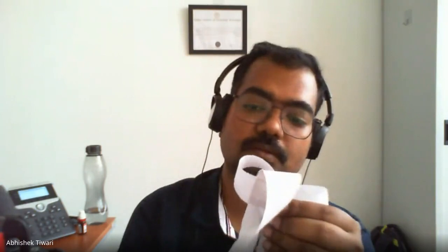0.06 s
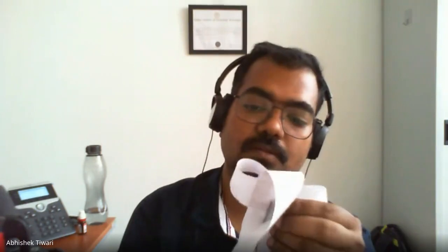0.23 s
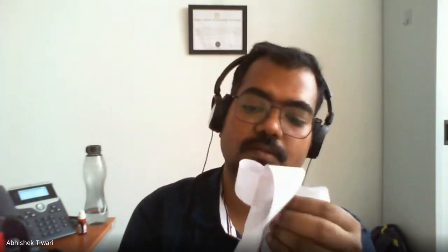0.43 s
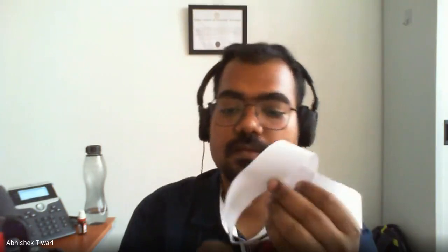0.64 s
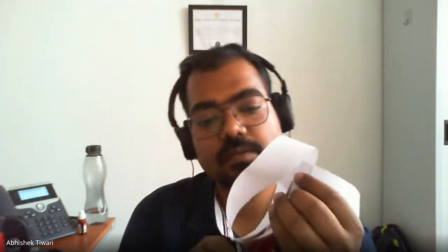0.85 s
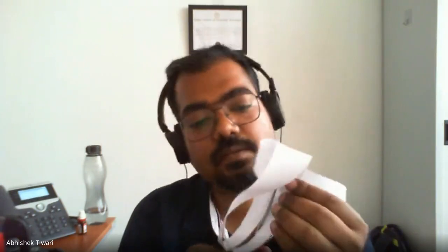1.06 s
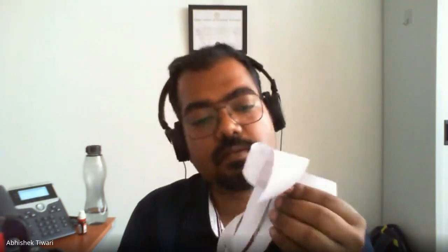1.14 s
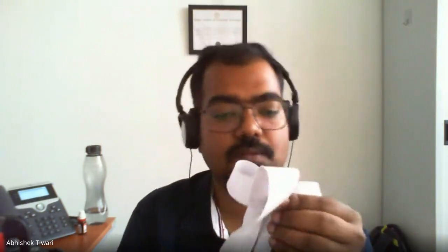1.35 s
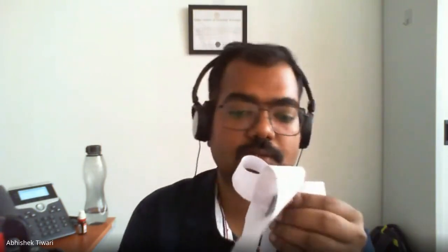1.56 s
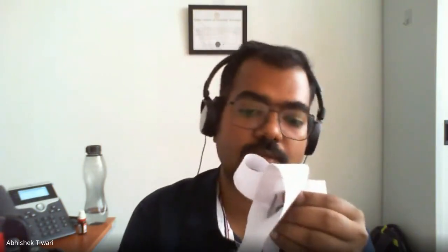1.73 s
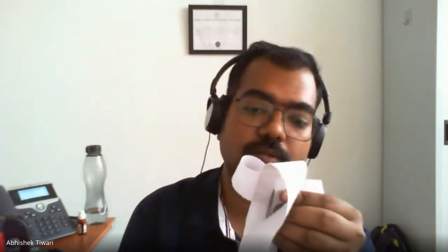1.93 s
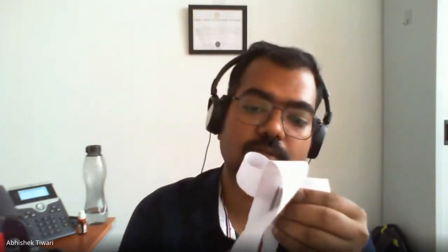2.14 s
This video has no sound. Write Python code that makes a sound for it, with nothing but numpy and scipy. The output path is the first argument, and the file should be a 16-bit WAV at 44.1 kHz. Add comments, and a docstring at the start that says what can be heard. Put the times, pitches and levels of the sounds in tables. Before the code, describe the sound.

Crisp close scissor snips through stiff paper, followed by near quiet, a brief papery slide and two dull thuds

```python
"""Scissors and a paper loop

Scissors and a stiff paper loop are heard close to a microphone in a small hard room, over a faint fan.
The paper snaps and ticks: short noise bursts. It hisses as it slides and is cut: grainy noise ringing the loop.
Fading tones make the short rings and, near the end, two soft thuds on the desk.
The room adds a noise tail. The fan is low noise with two unsteady tones; a noise suppressor and line hiss follow."""
import sys
import numpy as np
from scipy import signal
from scipy.fft import rfft, irfft
from scipy.io import wavfile
from scipy.ndimage import uniform_filter1d, map_coordinates

SR = 44100
rng = np.random.default_rng(int(sys.argv[2]) if len(sys.argv) > 2 else 0)


def elevation(decibels):
    """Turn decibel levels (scalar or array-like) into linear amplitude ratios."""
    levels = np.asarray(decibels, float)
    return 10 ** (levels / 20)


def to_wav(s):
    """Save 16-bit WAV."""
    ch = np.atleast_2d(s).T  # columns
    pcm = np.round(np.clip(ch, -1, 1) * 32767)  # PCM
    wavfile.write(sys.argv[1], SR, pcm.astype(np.int16))


N = 94815  # samples in the scene

# Paper snaps and ticks: peak_s, level_db (before the common snap level), t60_s (time to fall 60 dB),
# tilt_db_per_octave (above zero is brighter)
SNAPS = [(0.197, -32, .05, -8), (0.203, -12.5, .02, 1.5), (.2032, 1.5, .01, 3.5), (0.2052, -7, 0.058, -5),
         (0.235, -8.5, 0.027, 2), (0.2356, -22, .07, -15.5), (0.418, -27.5, 0.072, -8),
         (0.4266, -9, 0.016, -2), (.437, -22, 0.027, -2.5), (.4405, -6.5, 0.024, -3),
         (0.4498, -39.5, 0.24, -27), (0.4873, -22.5, 0.038, -9.5), (.543, -29, 0.085, -7.5),
         (0.5522, -19.5, 0.046, -3.5), (1.37, -35.5, 0.053, 7), (1.377, -43.5, 0.099, -10.2),
         (1.5438, -35, 0.039, 7.5), (1.554, -38, 0.041, 4), (1.651, -40.5, .025, 14.5),
         (1.751, -45.5, .02, 8), (1.771, -35, 0.048, 16.5), (1.7927, -31, 0.017, 10.5)]
# Colour of a snap before its tilt: frequency_hz, relative_gain_db
SNAP_COLOUR = [(180, -61.5), (400, -32.5), (1000, -27), (1600, -19.5), (2400, -12.5), (3500, -5.5),
               (4600, -2), (6000, -2.5), (8000, -5.5), (10000, -3), (12000, -10), (14600, -23),
               (16400, -49)]
# Paper slides and cuts: start_s, length_s, level_db, tilt_db_per_octave, release_t60_s
SLIDES = [(.172, 0.0074, -58.5, -0.5, .03), (0.183, 0.012, -57.5, 2.5, .03), (0.206, 0.038, -39, -7.4, 0.3),
          (0.506, 0.075, -44, 1, 0.056), (0.529, 0.027, -37, 0.9, 0.15), (.62, 0.048, -58.5, 3, 0.16),
          (0.691, 0.074, -62, 2.5, .2), (0.761, .03, -59, 2.9, .1), (.84, .09, -73, 2, 0.069),
          (1.338, 0.02, -62, 2, 0.034), (1.365, .02, -67, 13, 0.074), (1.482, 0.019, -69.5, 3, 0.035),
          (1.52, 0.022, -68, 1, 0.038), (1.553, .02, -75, 7.5, .05), (1.6, 0.015, -68, -1.5, 0.029),
          (1.645, 0.033, -67.5, 0, 0.3), (1.772, 0.046, -51, -1.4, .15), (1.835, 0.073, -37, -1.1, .12),
          (1.9, .04, -45, -1.9, 0.088), (1.943, 0.032, -66, 4.5, 0.39), (1.95, 0.039, -59.5, -5.5, 1)]
# Colour of a slide before its tilt and the loop's ring: frequency_hz, relative_gain_db
SLIDE_COLOUR = [(180, -51), (300, -25.5), (606, -16.5), (1000, -9.5), (1310, -16.5), (1500, -12.5),
                (2230, -9), (2430, -10), (10800, -4), (14800, -15), (16400, -51)]
# Resonances of the paper loop: centre_hz, width_hz, level_db (before the loop's share)
LOOP_RESONANCES = [(1058, 30, -4), (1529, 130, 6.5), (2345, 130, 8), (2786, 150, 5.5), (4390, 160, -2.5)]
# Short single rings of blade and loop: start_s, pitch_hz, level_db, t60_s
RINGS = [(.205, 389.5, -48.5, 0.34), (.4415, 5040, -19, .045), (.494, 4980, -44, 0.12),
         (.578, 399, -52.5, 0.31), (.776, 4520, -63.5, 0.18), (1.373, 951.5, -50, 0.098),
         (1.548, 1435, -70, .05), (1.55, 942, -62, 0.075), (1.769, 2720, -53.5, 0.25),
         (1.777, 4570, -61, 0.18), (1.789, 1510, -47, 0.11)]
# Soft thuds on the desk: start_s, level_db
THUDS = [(2.049, -46), (2.128, -49.5)]
# Tones of the desk in each thud: pitch_hz, level_db (within the thud), t60_s
DESK_TONES = [(121.25, 6.5, 0.19), (206.2, -1.5, 0.21), (760, -9.5, 0.13)]
# How long the room's echo lasts: frequency_hz, t60_s
ROOM_DECAY = [(300, 1), (1200, 0.64), (2500, 0.89), (6000, 0.43), (12000, 0.35)]
# How much fan noise the noise suppressor lets through over time; it opens at the first snap:
# time_s, rush_db (before flutter), hum_db (against the rush, before flutter)
FAN_LET_THROUGH = [(0, -77, -14), (.16, -78.5, -14), (0.188, -61, -10), (.27, -58.5, 1.5), (.4, -60, -6),
                   (.6, -69.5, -1), (.68, -63.5, 1), (.9, -67, -6), (1.1, -68, -11.5), (1.3, -69.5, -8),
                   (1.42, -68.5, -3.5), (1.6, -67, -7), (1.9, -64, -9), (2.15, -67, -2.5)]
# Colour of the fan's rush: frequency_hz, relative_gain_db
FAN_COLOUR = [(41, -31.5), (70, -9.5), (140, -3), (187, -5), (295, -6), (611, -10.5), (688, -12),
              (1050, -20), (1100, -17.5), (4000, -34), (5200, -59.5), (8800, -120)]
# Where the noise suppressor starts to act: frequency_hz, threshold_db (per time-frequency cell)
SUPPRESSOR_THRESHOLD = [(900, -140), (1300, -87.5), (2500, -80), (4500, -84.5), (8000, -90), (12000, -95)]
# Colour of the line hiss: frequency_hz, relative_gain_db
HISS_COLOUR = [(12, -17), (22, 2), (35, -14.5), (70, -16), (200, -31.5), (1000, -34), (1600, -27),
               (3000, -32.5), (7000, -34.5), (8500, -32.5), (11000, -35.5), (13500, -35.5), (15000, -41),
               (16400, -54)]


def unit(x):
    """Scales a sound to an rms of 1."""
    return x / np.sqrt(np.mean(x ** 2) + 1e-20)


def along(points, hz):
    """Reads a curve of (Hz, value) points on a log frequency axis."""
    point_hz, values = np.transpose(points)
    return np.interp(np.log(hz + 1), np.log(point_hz + 1), values)


def add(out, x, start_s):
    """Mixes x into out from the given time."""
    part = out[max(round(start_s * SR), 0):][:len(x)]
    part += x[:len(part)]


def wobble(rate, size=N):
    """Draws a smooth random curve with `rate` random points a second."""
    points = rng.standard_normal(int(size * rate / SR) + 4)
    return map_coordinates(points, [np.arange(size) * rate / SR])


def coloured(x, gain):
    """Shapes x with a gain over frequency, then scales it to rms 1."""
    hz = np.fft.rfftfreq(len(x), 1 / SR)
    return unit(irfft(rfft(x) * gain(hz), len(x)))


def paper_gain(colour, tilt_db):
    """Gives the paper's gain over frequency, bent a little differently each time."""
    bends_db = 2 * rng.standard_normal(40)
    bend_hz = np.linspace(0, 17000, num=40)
    tilt_from_hz = 2000 if tilt_db < 0 else 300  # the tilt stays level below this

    def gain(hz):
        octaves = np.log2(np.maximum(hz, tilt_from_hz) / 4000)
        return elevation(along(colour, hz) + tilt_db * octaves + np.interp(hz, bend_hz, bends_db))
    return gain


def snaps():
    """Stiff paper buckles: each spiky noise burst rises fast and dies away."""
    snap_db, rise_s = -11, 0.0013
    spikiness = 0.3  # depth of the fast random swings, as an exponent
    out = np.zeros(N)
    t = np.arange(-256, 3840) / SR  # time from the peak
    for peak_s, db, t60, tilt_db in SNAPS:
        burst = coloured(rng.standard_normal(len(t)), paper_gain(SNAP_COLOUR, tilt_db))
        rise = np.exp(np.minimum(t, 0) / rise_s)
        fall = elevation(-60 * np.abs(t) / max(t60, 0.003))
        shape = np.where(t < 0, rise, fall)
        spikes = np.exp(spikiness * wobble(957, size=len(t)))
        add(out, elevation(db + snap_db) * shape * burst * spikes, peak_s + t[0])
    return out


def loop_ring(hz):
    """Sums the loop's resonances: each lets through most at its own centre frequency."""
    total = 0
    for centre, width, db in LOOP_RESONANCES:
        total = total + elevation(db) * hz * width / (centre * centre - hz * hz + 1j * hz * width)
    return np.abs(total)


def slides():
    """Dense fibre grains ring the loop under a stroke that swells, holds and lets go."""
    grains_per_s, grain_db = 3000, 1.5
    loop_db = 3.5  # share of the loop's ring
    rise_share = 0.25  # rise as a share of the stroke's length
    out = np.zeros(N)
    t = np.arange(SR // 2) / SR
    for start_s, length, db, tilt_db, t60 in SLIDES:
        grains = rng.standard_normal(len(t)) * elevation(grain_db * wobble(grains_per_s, size=len(t)))
        sheet = paper_gain(SLIDE_COLOUR, tilt_db)
        rub = coloured(grains, lambda hz: sheet(hz) * (1 + elevation(loop_db) * loop_ring(hz)))
        swell = np.clip(t / (rise_share * length), 0, 1)
        release = elevation(-60 * np.maximum(t - length, 0) / max(t60, 0.005))
        add(out, elevation(db) * swell * release * rub, start_s)
    return out


def patchy(x):
    """Random patches of gain, about 700 Hz by 25 ms, make the slides and the echo uneven in colour."""
    patch_db = 1.6
    cells = signal.stft(x, nperseg=256)[2]
    field = uniform_filter1d(rng.standard_normal(cells.shape), size=4, axis=0)
    field = uniform_filter1d(field, size=8, axis=1)
    return signal.istft(cells * elevation(patch_db * unit(field)), nperseg=256)[1][:N]


def rings():
    """Blade and loop give single short rings: fading tones with a slightly unsteady phase."""
    rise_s, blur_rad = 0.0026, 1.2
    out = np.zeros(N)
    t = np.arange(SR // 2) / SR
    for start_s, hz, db, t60 in RINGS:
        shape = elevation(db - 60 * t / t60) * (1 - np.exp(-t / rise_s))
        phase = 2 * np.pi * hz * t + blur_rad * wobble(150, size=len(t))
        add(out, shape * np.sin(phase), start_s)
    return out


def thuds():
    """Soft thuds set off the desk's few low tones, which rise gently and fade."""
    rise_s = 0.015
    out = np.zeros(N)
    t = np.arange(SR // 2) / SR
    desk = sum(elevation(db - 60 * t / t60) * np.sin(2 * np.pi * hz * t) for hz, db, t60 in DESK_TONES)
    rise = 1 - np.exp(-(t / rise_s) ** 2)
    for start_s, db in THUDS:
        add(out, elevation(db) * rise * desk, start_s)
    return out


def room(x):
    """The room answers with a noise tail in which each frequency dies at its own speed."""
    hz, t, cells = signal.stft(rng.standard_normal(SR), SR, nperseg=256)
    fade = elevation(-60 * t / along(ROOM_DECAY, hz)[:, None])
    tail = signal.istft(cells * fade, SR, nperseg=256)[1]
    delayed = np.pad(x, (200, 0))  # the answer comes 200 samples late
    return signal.fftconvolve(delayed, tail / np.linalg.norm(tail))[:N]


def unsteady_line(hz, wander_hz):
    """Makes a tone whose pitch wanders and whose level flutters."""
    phase = 2 * np.pi * np.cumsum(hz + wander_hz * wobble(13)) / SR
    return elevation(2 * wobble(9)) * np.sin(phase)


def fan():
    """A low rush with two unsteady lines; its level flutters, and follows how far the suppressor has opened."""
    blade_db, flutter_db = -10, 2  # the low line's level is against the rush
    time_s, rush_points, hum_points = np.transpose(FAN_LET_THROUGH)
    t = np.arange(N) / SR
    rush_db = np.interp(t, time_s, rush_points)
    hum_db = np.interp(t, time_s, hum_points)
    rush = coloured(rng.standard_normal(N), lambda hz: elevation(along(FAN_COLOUR, hz)))
    hum = elevation(hum_db) * unsteady_line(485.5, wander_hz=4)
    blade = elevation(blade_db) * unsteady_line(119, wander_hz=20)
    return elevation(rush_db + flutter_db * wobble(20)) * (rush + hum + blade)


def suppress(x):
    """A noise suppressor turns down faint treble cells, which cuts the room's tails short."""
    floor_db = -21.5  # the most a cell is turned down
    hz, _, cells = signal.stft(x, SR, nperseg=512)
    power = uniform_filter1d(np.abs(cells) ** 2, size=9, axis=-2)  # averaged over frequency
    power = uniform_filter1d(power, size=3, axis=-1)  # then over time
    threshold = elevation(along(SUPPRESSOR_THRESHOLD, hz))[:, None] ** 2
    gain = power ** 2 / (power ** 2 + threshold ** 2)
    return signal.istft(cells * np.maximum(gain, elevation(floor_db)), SR, nperseg=512)[1][..., :N]


def line_hiss():
    """The line adds steady noise with its own colour."""
    hiss_db = -74
    return elevation(hiss_db) * coloured(rng.standard_normal(N), lambda hz: elevation(along(HISS_COLOUR, hz)))


def scene():
    """Mixes the paper, rings and thuds with the room's answer and the fan."""
    room_db, slides_to_room_db = -10.5, -17.5  # slides reach the room more weakly than snaps
    snap, slide = snaps(), slides()
    echo = elevation(room_db) * room(snap + elevation(slides_to_room_db) * slide)
    mix = snap + patchy(slide + echo) + rings() + thuds() + fan()
    return mix[None]


def band_limit(x):
    """A steep low-pass at the top of the band."""
    return signal.sosfilt(signal.butter(12, 16510, fs=SR, output="sos"), x)


def record(dry):
    """Cleans the scene with the noise suppressor, then adds the hiss of the line."""
    mix = suppress(dry) + line_hiss()
    return band_limit(mix)


dry = scene()
out = record(dry)
to_wav(out)
```